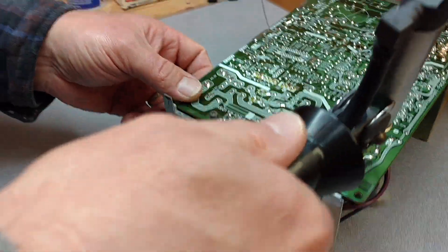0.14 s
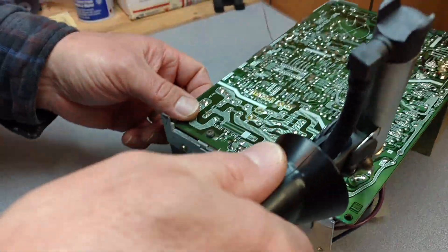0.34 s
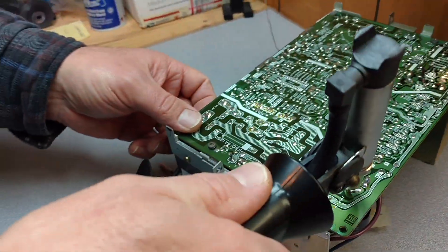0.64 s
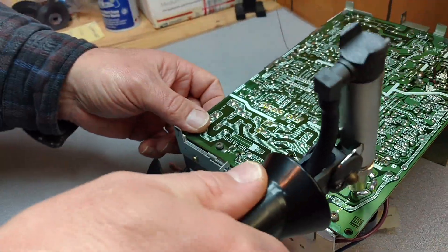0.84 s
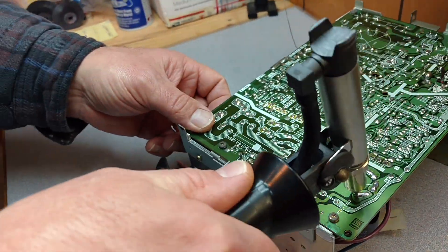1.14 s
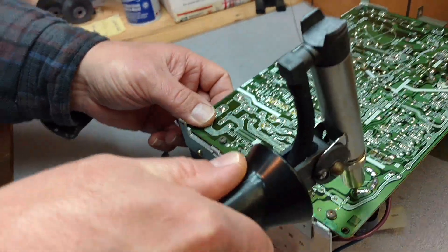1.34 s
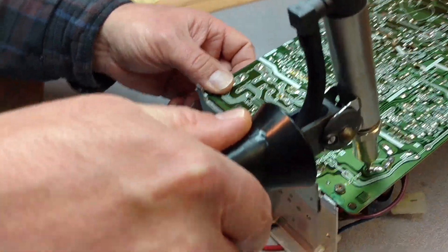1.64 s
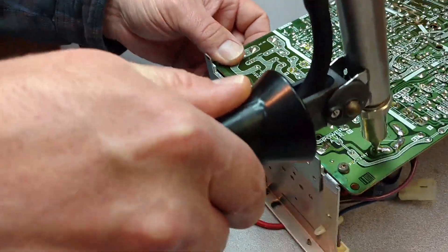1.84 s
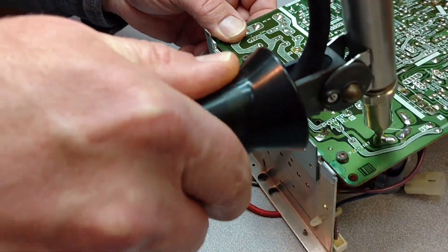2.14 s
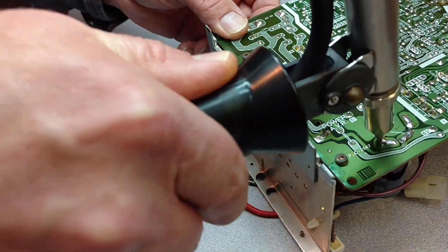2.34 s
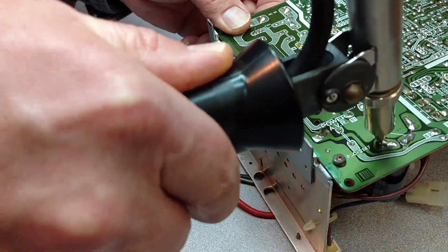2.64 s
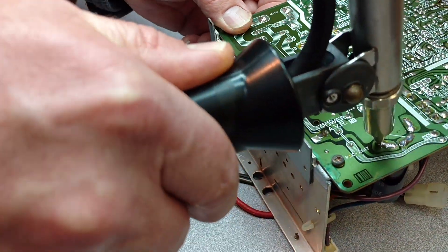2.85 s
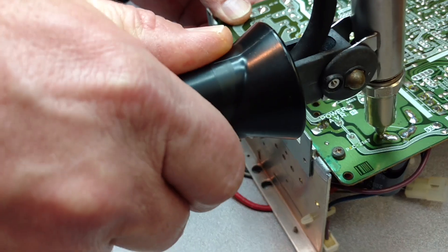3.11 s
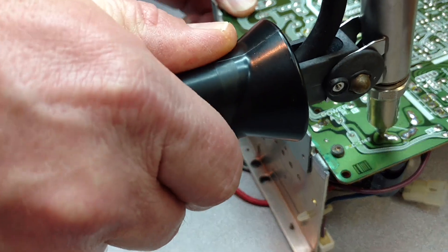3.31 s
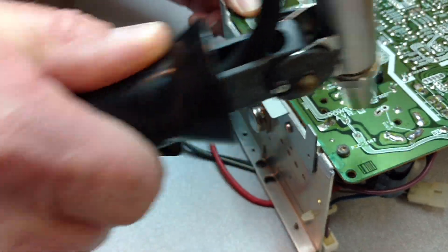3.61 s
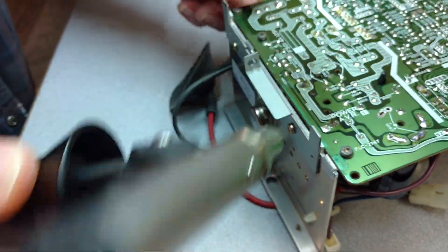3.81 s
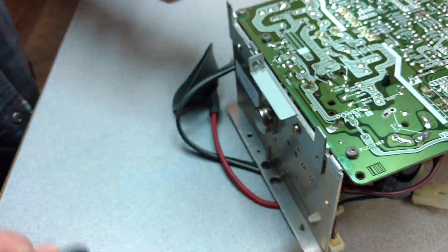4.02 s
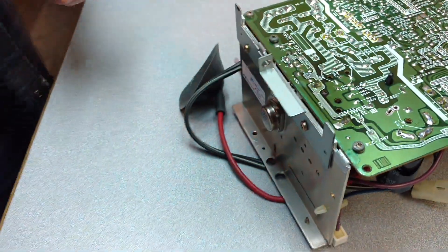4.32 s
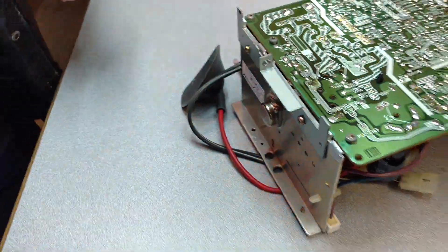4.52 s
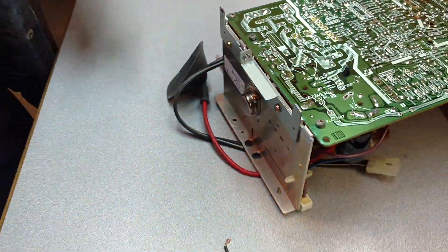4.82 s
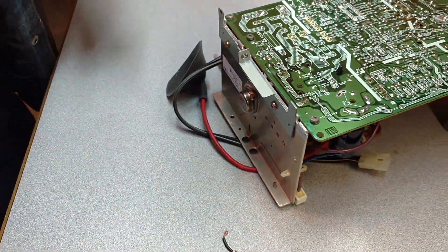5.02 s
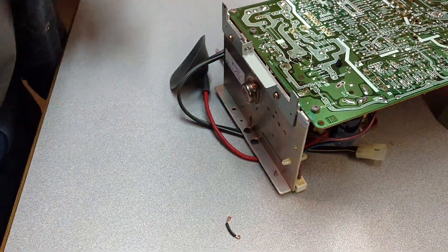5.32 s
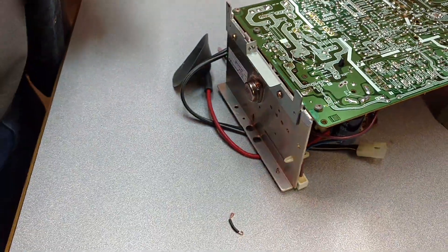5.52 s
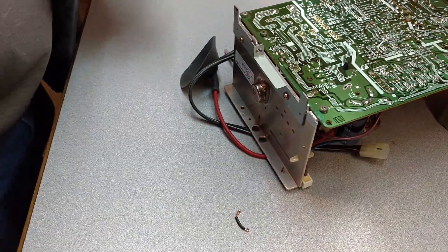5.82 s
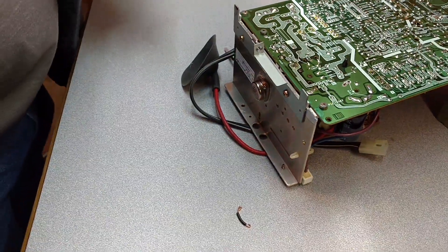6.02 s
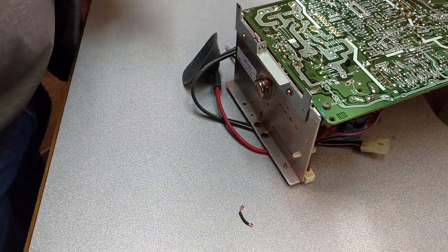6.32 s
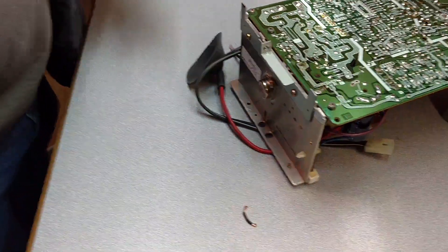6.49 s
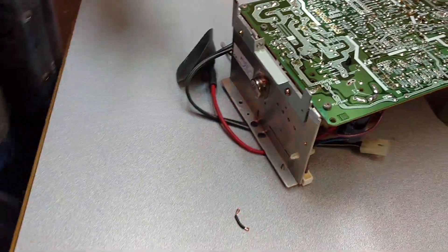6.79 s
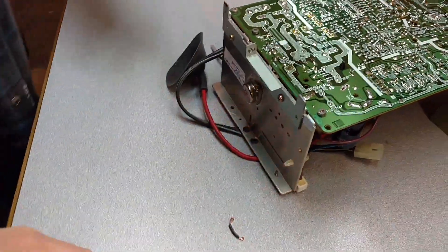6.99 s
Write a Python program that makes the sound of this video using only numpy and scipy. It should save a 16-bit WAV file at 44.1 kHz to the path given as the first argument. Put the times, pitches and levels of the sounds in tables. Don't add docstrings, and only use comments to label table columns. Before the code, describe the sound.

Close stereo microphone at a workbench in a quiet shop with soft mains hum and fan air. From 0 s a small vacuum pump runs as a dense, low, buzzing throb of about 52 strokes a second, with light metallic tip taps near 0.2, 0.5 and 1.35 s and a growing fine chatter from 2 s. At about 3.05 s the tip lifts with a wet, crackling slurp and the pump slows slightly; at 3.36 s a dry, sharp trigger crack. Air then hisses through the open nozzle with very high, thin whistles, surging around 4.2 s. From 4.5 s the hiss drops and the pump tightens and rises as vacuum builds. Hollow hard clunks at 5.6 to 5.85 s and 6.1 to 6.25 s mark the tool entering its stand. At 6.2 s the pump cuts off, coasting down within a fraction of a second. Quiet hum remains, then a scraping drag from 6.75 s, strongest near 7.1 s.

```python
import sys
import numpy as np
from scipy import signal
from scipy.fft import rfft, irfft
from scipy.io import wavfile
from scipy.ndimage import uniform_filter1d

SR = 44100
rng = np.random.default_rng(int(sys.argv[2]) if len(sys.argv) > 2 else 0)


def attenuation_scalar(level_db):
    decades = np.asarray(level_db, float) / 20
    return 10 ** decades


def store_wav(level_fs):
    pcm = np.round(np.clip(np.atleast_2d(level_fs), -1, 1) * 32767)
    wavfile.write(sys.argv[1], SR, pcm.T.astype(np.int16))


N = 315315


def evened(x):
    return x / np.sqrt(np.mean(x ** 2) + 1e-20)


def read(points, hz, order=1):
    columns = np.transpose(points)
    return np.interp(np.log(hz + 1), np.log(columns[0] + 1), columns[order])


def curves(rows):
    s, *columns = np.transpose(rows)
    t = np.arange(N) / SR
    gate = np.clip(np.minimum(t - s[0] + 1e-3, s[-1] - t) * 100, 0, 1)
    return [np.interp(t, s, c) for c in columns] + [gate]


def resonate(x, hz, width):
    turn = np.exp(2j * np.pi * np.cumsum(hz * np.ones(x.shape[-1])) / SR)
    r = np.exp(-np.pi * width / SR)
    return 2 * (turn * signal.lfilter([1 - r], [1, -r], x / turn)).real


def resonate_twice(x, hz, width):
    return resonate(resonate(x, hz, width), hz, width)


# pitch_hz, level_db, phase_rad
PORT_BALANCE = [(50, -3, 0.36), (130, 1, -0.047), (252, -2, -0.4), (460, -9.5, -0.12), (543, 0.5, 0.3),
                (630, 0, 0.54), (740, -7, 0.19), (1090, -12.5, -0.51), (1250, -12.5, -0.82),
                (1390, 0, -1.2), (6930, 0.5, 0.07), (13900, 15.5, 0.9)]
# pitch_hz, likeness_0_to_1
PORT_LIKENESS = [(100, 0.99), (400, 1), (600, 0.44), (800, 0.94), (1200, 0.077), (2000, 0.019),
                 (5000, 0.066), (15000, 0.037)]


def noise(colour, patchy_db):
    hz = np.fft.rfftfreq(512, 1 / SR)
    a, b, c, d, patches = rng.standard_normal((N // 128 + 5, 257, 5)).T
    patches = evened(uniform_filter1d(uniform_filter1d(patches, size=5, axis=0), size=20, axis=1))
    same = np.clip(read(PORT_LIKENESS, hz), 0, 1)[:, None]
    shared = a + 1j * b
    left = shared * attenuation_scalar(read(PORT_BALANCE, hz))[:, None]
    right = same * shared + np.sqrt(1 - same ** 2) * (c + 1j * d)
    spectrum = np.array([left, right]) * attenuation_scalar(read(colour, hz)[:, None] + patchy_db * patches)
    return evened(signal.istft(spectrum, nperseg=512, noverlap=384)[1][:, :N])


# start_s, depth_db
DUCKS = [
    (3.056, 11.5),
    (3.365, 14),
    (5.685, 8),
    (6.22, 7.5),
]


def gain_db():
    recover_db_per_s = 7.5
    t = np.arange(N) / SR
    down = [np.where(t > s, depth_db - recover_db_per_s * (t - s), 0) for s, depth_db in DUCKS]
    return -uniform_filter1d(np.maximum(np.max(down, axis=0), 0), size=600)


# pitch_hz, level_db
AIR = [(40, -34), (90, -6), (180, 10.5), (300, 11), (400, 4), (500, -4.5), (900, -2), (1500, -17),
       (2300, -15.5), (4000, -24.5), (8000, -30), (12000, -46.5), (15500, -66)]
# pitch_hz, width_hz, level_db over the hum
FAN = [(247.6, 16, -6), (344.5, 14, -15), (522, 8, -26), (792, 9, -18), (1007, 10, -32)]


def room(hum_db=-30.5):
    waver = evened(uniform_filter1d(uniform_filter1d(rng.standard_normal(N), size=2000), size=2000))
    hum = np.sqrt(2) * np.sin(2 * np.pi * 120 * np.arange(N) / SR + 0.08 * waver)
    hum *= attenuation_scalar(1.5 * np.roll(waver, 9000))
    blades = rng.standard_normal(N)
    fan = sum(attenuation_scalar(db) * evened(resonate_twice(blades, hz, width)) for hz, width, db in FAN)
    tones = (hum + fan) * attenuation_scalar([[-1.5], [.1]])
    return attenuation_scalar(hum_db + gain_db()) * (tones + attenuation_scalar(-2.5) * noise(AIR, patchy_db=1.8))


# start_s, pressure_db
SLIDE = [
    (6.69, -74),
    (6.76, -38),
    (6.83, -32.5),
    (6.94, -35),
    (7.12, -24),
    (7.15, -40),
]
# pitch_hz, width_hz, level_db
BENCH = [(240, 170, 4), (830, 77, -2), (1384, 140, -4), (1700, 150, -2.5), (1950, 150, -2.5),
         (2370, 480, 0.5)]
# pitch_hz, width_hz, level_db
SCRAPE = [(2940, 350, 9.5), (3600, 130, 12), (3900, 120, 13), (4410, 100, 7.5), (5160, 640, 11.5),
          (5930, 1200, 6), (7300, 1700, 3), (11000, 3300, -31)]


def slide():
    bench_lag_s = 0.052
    settle_s, settle_db, settle_t60_s = 5, -41, 0.39
    pressure_db, gate = curves(SLIDE)
    grain_size = np.repeat(rng.exponential(1, N // 40 + 1), 40)[:N]
    grains = rng.standard_normal((2, N)) * attenuation_scalar(2.0 * grain_size)
    grains[1] = 0.13 * grains[0] + 0.8 * grains[1]

    def rung(modes):
        return evened(sum(attenuation_scalar(db) * evened(resonate(resonate(grains, hz, width), hz, 2.5 * width))
                          for hz, width, db in modes))

    since = np.arange(N) / SR - settle_s
    settle = (since > 0) * attenuation_scalar(settle_db - 60 * abs(since) / settle_t60_s)
    press = attenuation_scalar(pressure_db) * gate
    late_press = np.roll(press, round(bench_lag_s * SR)) * gate
    return rung(BENCH) * (attenuation_scalar(-4.0) * late_press + settle) + rung(SCRAPE) * attenuation_scalar(-8.0) * press


# start_s, level_db
TICKS = [(0, -60), (1, -56), (2, -51), (2.15, -46), (2.9, -45), (3.05, -44)]


def chatter(turns):
    level_db, gate = curves(TICKS)
    size = attenuation_scalar(4 * np.clip(rng.standard_normal(400), -2, 1.6))[turns.astype(int)]
    burst = rng.standard_normal((2, N)) * size * np.exp(-((turns - .3) % 1) / 0.3)
    burst[:, 1:] += 12 * np.diff(np.floor(turns - .3)) * size[1:]
    ring = evened(resonate_twice(burst, 1710, 240)) * attenuation_scalar(level_db - 1)
    steady = attenuation_scalar(-51.0) * evened(resonate_twice(burst, 2200, 1500))
    return (ring + steady) * gate


def trigger():
    start_s, peak_db, decay_s = 3.3604, -12, .0005
    t = np.arange(N) / SR - start_s
    crack = rng.standard_normal(N) + 0.75 * rng.standard_normal((2, N))
    crack = crack * (t > 0) * np.exp(-abs(t) / decay_s)
    crack = signal.sosfilt(signal.butter(2, [900, 11000], "band", fs=SR, output="sos"), crack)
    return attenuation_scalar(peak_db) * crack / abs(crack).max()


# start_s, peak_db, ring_hz, ring_db over the rattle
TAPS = [
    (0.03, -32, 800, 10),
    (0.161, -20, 1900, 2),
    (0.5492, -27, 1950, 3),
    (1.3548, -30, 859, -8),
    (3.0415, -27, 1000, 2),
]
SLURP = [(3.0527, -19.5, 915, -20), (3.0619, -9.5, 1080, -40), (3.0665, -21, 1080, -26),
         (3.072, -19, 1030, -30), (3.0772, -22, 1030, -29.5), (3.082, -27, 1030, -32),
         (3.0872, -18.5, 1030, -32), (3.092, -33, 1030, -30), (3.0975, -30, 1030, -30),
         (3.103, -27, 1030, -30), (3.1094, -23, 1080, -28), (3.1254, -30, 860, -25), (3.14, -29, 914, -15)]
SCUFFS = [
    (6.169, -25, 1000, -28),
    (6.207, -24, 1000, -37),
    (6.219, -33, 1000, -30),
    (6.3456, -53, 900, -10),
]
SNAPS = [(3.3603, -27, 1090, -10)]
KNOCKS = [(5.6087, -25.5, 840, -2), (5.6775, -4.5, 1075, 1.5), (5.6785, -8.5, 800, 2), (5.683, -19, 710, 2),
          (5.689, -11.5, 1290, 1), (5.697, -23, 830, 12), (5.712, -26.5, 945, 12.5),
          (5.8342, -20.5, 1160, 3), (5.838, -18, 1220, 7), (5.8474, -30.5, 1090, 16),
          (6.126, -15.5, 1130, 3.5), (6.1653, -17, 1110, 6), (6.1745, -15.5, 1090, 9),
          (6.1716, -11, 1150, -13), (6.2054, -35, 787, 4), (6.211, -20, 890, -2), (6.225, -24, 890, 17),
          (6.2185, -8.5, 1000, 7), (6.2305, -29, 870, 15), (6.2365, -33, 834, 17),
          (6.251, -24.5, 1120, 16.5), (6.2585, -28, 1220, 16), (6.264, -43, 1160, 3), (6.183, -26, 1500, 4),
          (6.8144, -33.5, 815, 15.5), (7.0594, -22, 1300, -20), (7.112, -28, 860, 8)]
# pitch_hz, width_hz, level_db
STAND = [(1550, 730, 3.5), (2667, 203, 10.5), (3780, 670, -4.5), (5060, 1260, -12.5), (5300, 3500, -15.5)]


def knocks():
    # hits, fizz_db over the rattle, t60_s, crack share
    kinds = [(TAPS, -55, .1, .3), (SLURP, -13, .045, .9), (SCUFFS, -3, .07, .2), (SNAPS, 0, .016, 2.0),
             (KNOCKS, -55, .085, 2.2)]
    out = np.zeros((2, N + 8192))
    t = np.arange(8192) / SR
    hz = np.fft.rfftfreq(8192, 1 / SR)
    stand = sum(attenuation_scalar(db) / np.sqrt(1 + (2 * (hz - f) / width) ** 4) for f, width, db in STAND)
    fizz_colour = hz / (hz + 4000) * attenuation_scalar(-hz / 900)
    for hits, fizz_db, t60_s, crack in kinds:
        fade = attenuation_scalar(-60 * t / t60_s)
        for start_s, peak_db, ring_hz, ring_db in hits:
            hit = rng.standard_normal((2, len(t)))
            hit[:, :40] = hit[0, :40]
            rattle = evened(irfft(rfft(hit) * stand))
            rattle += attenuation_scalar(fizz_db + 12.5) * evened(irfft(rfft(hit) * fizz_colour))
            rise = 1 - np.exp(-t / .0002)
            rattle *= rise * (fade + crack * np.exp(-t / 0.00045))
            shaking = (hit + hit[0]) * fade
            struck = np.array([[22], [13]]) * (t == 0)
            ring = resonate(resonate(.45 * shaking + struck, ring_hz, 120), ring_hz, 500)
            thud = resonate_twice(shaking, 520, 450)
            ring = ring / abs(ring).max() + attenuation_scalar(-4) * thud / abs(thud).max()
            sound = rattle / abs(rattle).max() + attenuation_scalar(min(ring_db, 16) - 7.0) * ring / abs(ring).max()
            out[:, round(start_s * SR):][:, :len(t)] += attenuation_scalar(peak_db - 0.5) * sound
    return out[:, :N]


# start_s, level_db
JET = [(3.03, -94), (3.1, -55), (3.3, -59), (3.4, -63.5), (4.1, -59.5), (4.25, -54.5), (4.475, -55.5),
       (4.49, -60.5), (5.7, -62)]
# pitch_hz, level_db
JET_COLOUR = [(1900, 5.5), (2250, -8), (2750, 0), (3200, 8), (5000, 9.5), (8000, 5), (10000, 0),
              (12000, -13), (15500, -28)]
# start_s, end_s, pitch_hz, fall_hz per chirp, level_db
WHISTLES = [(3.458, 3.536, 9740, 407, -47), (3.516, 3.648, 14950, 1100, -44),
            (3.53, 3.618, 13450, -500, -76), (3.616, 3.646, 11600, 2592, -48),
            (3.803, 4.013, 12100, 100, -57), (4.02, 4.158, 12050, 118, -44), (4.022, 4.19, 13900, 200, -48),
            (4.203, 4.33, 13900, 200, -52), (3.682, 3.7, 11770, 100, -55)]


def whistles(turns):
    out = np.zeros((2, N))
    for start_s, end_s, pitch_hz, fall_hz, level_db in WHISTLES:
        span = slice(round(start_s * SR), round(end_s * SR))
        phase = turns[span] % 1
        tone = evened(resonate(rng.standard_normal((2, len(phase))), pitch_hz - fall_hz * phase, 90))
        swell = np.sin(np.pi * phase) ** 2 * np.hanning(len(phase)) ** .5
        out[:, span] += attenuation_scalar(level_db + np.array([[3], [-2]])) * tone * swell
    return out


def jet(turns):
    t = np.arange(N) / SR
    flow_db, gate = curves(JET)
    hiss = noise(JET_COLOUR, patchy_db=0.8) * (1 + 0.16 * np.cos(2 * np.pi * turns))
    throat = evened(resonate_twice(hiss, 3800, 800))
    throat_db = -7 + 1.3 * (flow_db - JET[5][1])
    out = (hiss + attenuation_scalar(throat_db) * throat) * attenuation_scalar(flow_db + 5.0) * gate
    since_gulp = t - SLURP[1][0]
    out += throat * (since_gulp > 0) * attenuation_scalar(-40 - 60 * abs(since_gulp) / .2)
    opening = np.clip(1 - curves(LOAD)[0], .4, 1)
    slurp_fizz_db = 12 * np.exp(-((t - JET[0][0]) / 0.46) ** 2)
    fizz_db = flow_db + 3.5 + slurp_fizz_db + np.array([[2], [-2]])
    fizz = evened(resonate(resonate(hiss, 16400, 3500), 17600, 3500))
    return out + opening * fizz * attenuation_scalar(fizz_db) * gate + whistles(turns)


CROSS, CROSS_DELAY = .74, 17


def housing(orders, hz, direct, flutter_s, scatter, bright_db):
    f = np.fft.fftfreq(8192, 1 / SR)
    table = [(1, -50)] + [(k * hz, db + bright_db * (k > 12)) for k, db in orders]
    table += [(hz * 34, -60), (hz * 60, -100)]
    thinned = abs(1 - CROSS * np.exp(-2j * np.pi * f * CROSS_DELAY / SR))
    gain = np.log(attenuation_scalar(np.interp(abs(f), *np.transpose(table))) / thinned)
    ring = np.exp(gain - 1j * signal.hilbert(gain).imag)
    late = np.exp(-2j * np.pi * f * flutter_s)
    ring *= (direct - late) / (1 - direct * late)
    bounce = np.exp(-2j * np.pi * f * .0037)
    ring *= np.where(abs(f) > 10.5 * hz, (scatter - bounce) / (1 - scatter * bounce), 1)
    turn = .5j * np.sign(f) * read(PORT_BALANCE, abs(f), order=2)
    half = attenuation_scalar(read(PORT_BALANCE, abs(f)) / 2) * np.exp(turn)
    ports = np.fft.ifft([ring * half, ring / half]).real
    ports = np.roll(ports, 64, axis=1)[:, :4096]
    return ports / np.linalg.norm(ports[1])


# start_s, strokes_per_s
SPEED = [(0, 51.85), (1.8, 51.92), (2.6, 52.0), (3.055, 52.3), (3.078, 59), (3.1, 52.3), (3.13, 49.7),
         (3.3, 49.35), (3.5, 49.3), (4.0, 49.31), (4.5, 49.15), (4.8, 49.3), (5.0, 50.3), (5.2, 50.75),
         (5.4, 51.4), (5.7, 52.2), (5.95, 52.15), (6.15, 52.5), (6.2, 52)]
# start_s, load (0 tip open, 1 half shut, 2 sealed)
LOAD = [(0, 1.9), (3.06, 1.9), (3.075, 0.69), (3.3, 0.45), (3.42, 0.0047), (4.48, 0.0022), (4.52, 0.26),
        (4.62, 0.48), (4.8, 0.44), (5.0, 1.0), (5.17, 1.27), (5.35, 1.4), (5.55, 1.82), (6.2, 2.6)]


def crank():
    rate, gate = curves(SPEED)
    load = np.clip(curves(LOAD)[0], 0, 2)
    warm_db = -2.5 * np.exp(-np.arange(N) / SR)
    level_db = -19 - 1.5 * (2 - load) + warm_db + 1.14 * gain_db()
    return np.cumsum(rate) / SR + 0.293, rate, load, level_db, gate


# start_s, lag_ms, strength of the stroke
REBOUND = [(3.06, 2.7, 0), (3.08, 4.6, .6), (3.16, 5.4, .8), (3.3, 6.8, .6), (3.42, 7, 0), (4.48, 7, 0),
           (4.52, 6.8, .6), (4.62, 6.3, .7), (4.72, 4.7, .9), (4.85, 3.7, 1), (5.0, 2.95, 1.4),
           (5.1, 2.7, 1.4), (5.4, 2.6, 1), (5.56, 2.5, 0)]


def strokes(turns, rate, level_db, gate):
    at = np.flatnonzero(np.diff(np.floor(turns)) * (gate[1:] > 0))
    jittered = np.maximum(at + np.round(rng.standard_normal(len(at))).astype(int), 0)
    uneven = attenuation_scalar(.5 * rng.standard_normal(len(at)))
    out, slaps = np.zeros((2, N))
    out[jittered] = attenuation_scalar(level_db[at]) * uneven * np.sqrt(SR / rate[at])
    lag_ms, slap, slapping = curves(REBOUND)
    slaps[at + np.round(lag_ms[at] * SR / 1000).astype(int)] = (slap * slapping)[at] * out[jittered]
    dull = signal.butter(1, [240, 800], "band", fs=SR, output="sos")
    out += attenuation_scalar(2) * signal.sosfiltfilt(dull, slaps)
    out[0] = .6 * out[jittered[0]]
    last = np.arange(6)
    coast_s = 6.2168 + np.cumsum(.0172 * 1.22 ** last)
    out[(coast_s * SR).astype(int)] = attenuation_scalar(-24 - 2.5 * last) * np.sqrt(SR / LOAD_HZ[-1])
    return out


# pitch_hz, level_db
PUFF = [(60, -37), (110, -3), (220, 9), (350, -17), (500, 0), (800, -3), (1100, -1), (1350, -10.5),
        (1700, -17.5), (2300, -16), (4000, -24), (8000, -34.5), (11000, -70), (15500, -103)]


def puffs(turns, load, level_db, gate):
    strength = attenuation_scalar(rng.standard_normal(400)[turns.astype(int)])
    valve = 0.63 + strength * np.exp(-((turns - .15) % 1) / 0.98)
    puff_db = level_db - 19 - 5 * (1.5 - load)
    return noise(PUFF, patchy_db=0.5) * uniform_filter1d(valve, size=60) * attenuation_scalar(puff_db) * gate


# order (multiple of the stroke rate), level_db
OPEN = [(1, -30), (2, -17), (3, -1), (4, -11), (5, -3), (6, -7), (7, -12), (8, -3), (9, 0), (10, -9),
        (11, -5), (12, -6), (13, -15), (14, -9), (15, -8), (16, -17), (17, -19), (18, -11), (19, -19),
        (20, -15), (21, -8), (22, -18), (23, -22), (24, -27), (25, -25), (26, -16), (27, -26)]
CLOSING = [(1, -25), (2, -10), (3, 2.5), (4, -1), (5, -11), (6, -7), (7, -1.5), (8, 0), (9, -3), (10, -1.5),
           (12, -6), (14, -8), (16, -6), (18, -13.5), (21, -12.5), (24, -13.5), (27, -12), (30, -15)]
HALF = [(1, -34), (2, -24), (3, -1), (4, 3), (5, -2), (6, -4), (7, -6.5), (8, -5), (9, 3), (10, 2),
        (11, -19), (12, -6.5), (14, -7.5), (16, -6), (18, -11.5), (20, -15), (23, -16), (26, -17),
        (29, -19)]
NEARLY = [(1, -28), (2, -30), (3, -14), (4, -9), (5, -9), (6, -6.5), (7, -10), (8, -7.5), (9, 0), (10, -6),
          (11, -14), (12, -15.5), (14, -16), (16, -18), (18, -20), (20, -13), (23, -29), (25, -12.5),
          (28, -31)]
SEALED = [(1, -30), (2, -25), (3, -19), (4, -15), (5, -12), (6, -10), (7, -9), (8, -4), (9, 0), (10, -10),
          (11, -19), (12, -17), (13, -23), (14, -17), (15, -20), (16, -26), (17, -20), (18, -22), (19, -21),
          (20, -18), (21, -24), (22, -24), (23, -27), (24, -26), (25, -31), (26, -34), (27, -34)]
LOAD_AT = [0, .5, 1, 1.5, 2]
LOAD_HZ = [49.3, 49.3, 50.5, 51.2, 52]
LOAD_DB = [-1, -1.5, -2, -2, 0.46]
DIRECT = [.8, .9, .94, .9, .74]
FLUTTER_S = [.0066, .0075, .007, .0066, .0066]
SCATTER = [.5, .85, .97, .9, .35]
BRIGHT_DB = [-0.58, 0.062, 1.7, 1.4, -0.82]
# start_s, pitch_hz, share_0_to_1
THIN_BAND = [(5.5, 380, 0.6), (5.6, 400, 0.54), (6.2, 400, 0.7)]


def pump(turns, rate, load, level_db, gate):
    beats = strokes(turns, rate, level_db, gate)
    out = np.zeros((2, N))
    for k, orders in enumerate([OPEN, CLOSING, HALF, NEARLY, SEALED]):
        share = attenuation_scalar(LOAD_DB[k]) * np.interp(load, LOAD_AT, np.eye(len(LOAD_AT))[k]) ** .75
        ring = housing(orders, LOAD_HZ[k], DIRECT[k], FLUTTER_S[k], SCATTER[k], BRIGHT_DB[k])
        out += signal.oaconvolve((beats * share)[None], ring, axes=1)[:, :N]
    thin_hz, swallowed, moving = curves(THIN_BAND)
    out -= swallowed * moving * resonate(out, thin_hz, 80)
    return out + puffs(turns, load, level_db, gate)


def scene():
    turns, rate, load, level_db, gate = crank()
    background = room() + slide()
    tip = chatter(turns) + trigger() + knocks() + jet(turns)
    return background + tip + pump(turns, rate, load, level_db, gate)


def roll_off(x):
    return signal.sosfilt(signal.butter(12, 16660, fs=SR, output="sos"), x)


# start_s,
# left_minus_right_db
LEAN = [(0, -3), (.8, -3.5), (1.4, -4), (2.2, -2), (3, -0.9), (4.3, -0.5), (5.2, 0), (5.8, 0), (6.4, -2)]


def record(dry):
    late = np.pad(dry[::-1], ((0, 0), (CROSS_DELAY, 0)))[:, :N]
    wide = dry - CROSS * late
    wide = wide - .65 * resonate(wide, 2400, 260)
    bass = signal.sosfiltfilt(signal.butter(1, 800, fs=SR, output="sos"), wide)
    wide = wide + bass * (attenuation_scalar(curves(LEAN)[0] * np.array([[.5], [-.5]])) - 1)
    edge = signal.firwin(255, 15850, window=("kaiser", 8), fs=SR)
    wide = signal.oaconvolve(wide, edge[None], "same")
    return roll_off(np.clip(wide, -1, 1))


dry = scene()
out = record(dry)
store_wav(out)
```